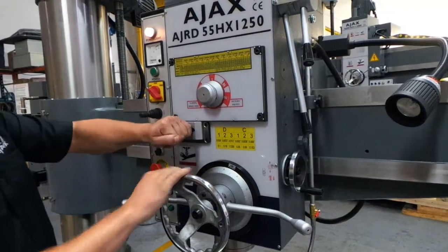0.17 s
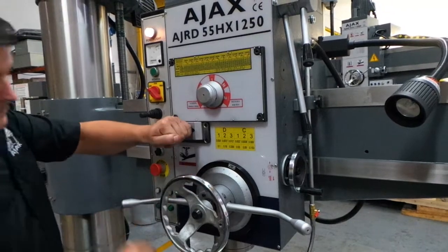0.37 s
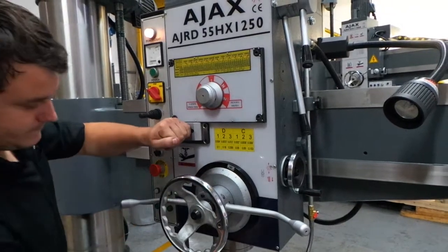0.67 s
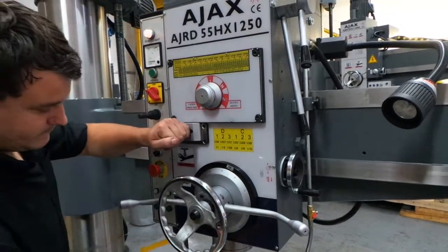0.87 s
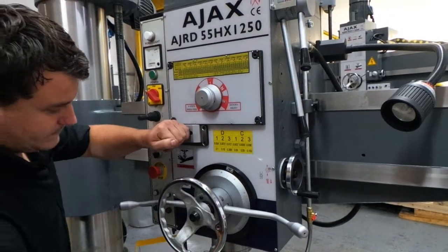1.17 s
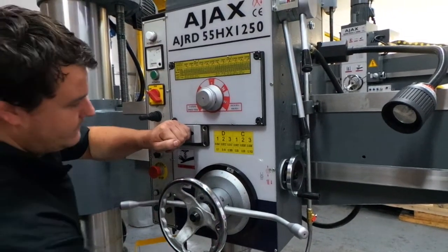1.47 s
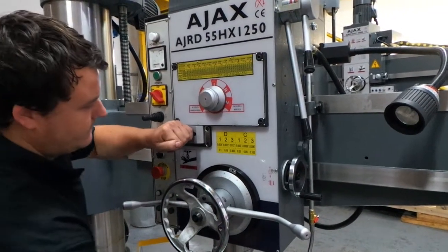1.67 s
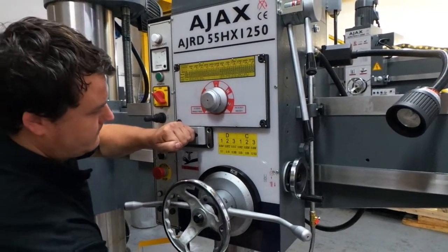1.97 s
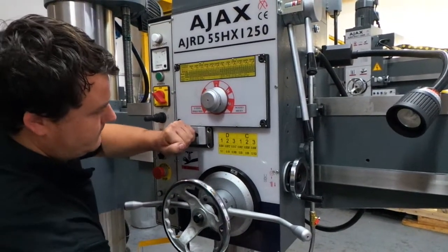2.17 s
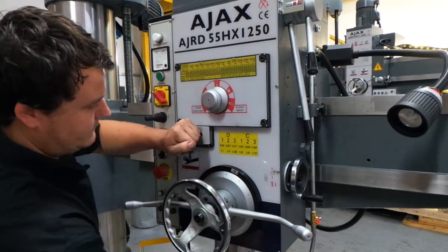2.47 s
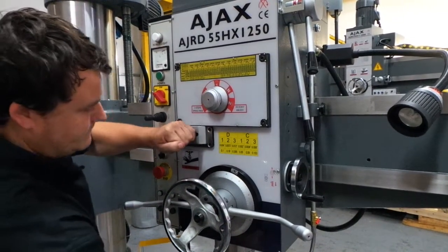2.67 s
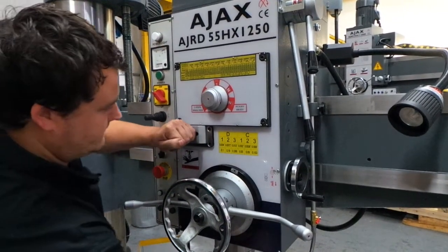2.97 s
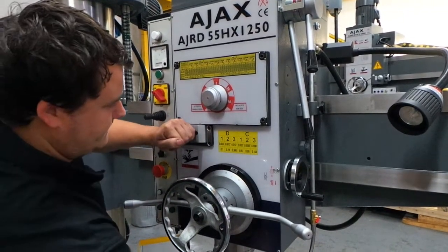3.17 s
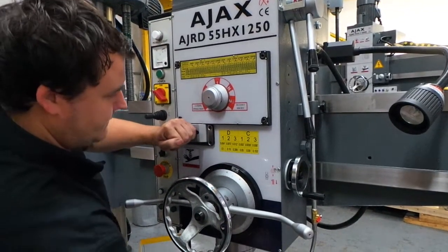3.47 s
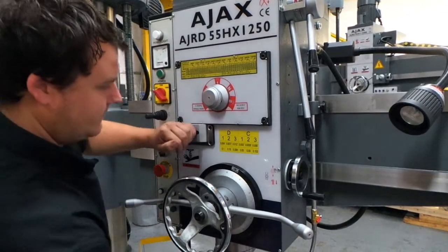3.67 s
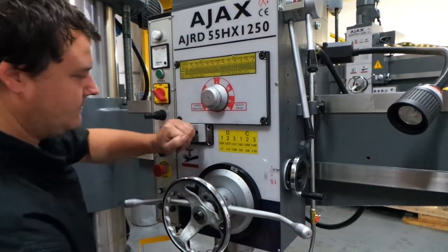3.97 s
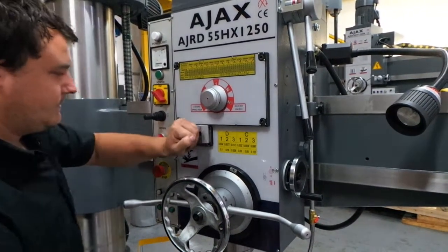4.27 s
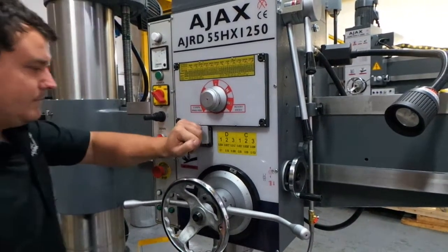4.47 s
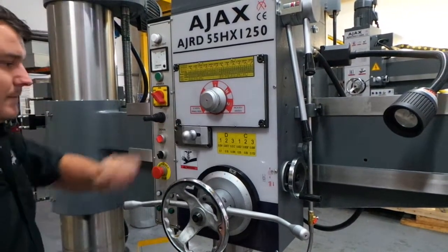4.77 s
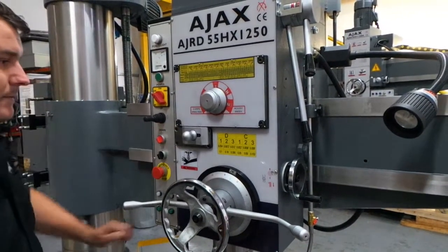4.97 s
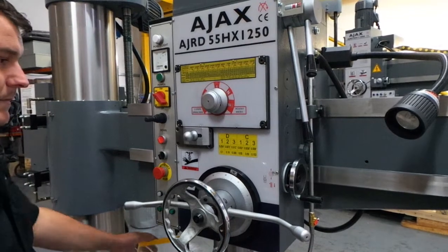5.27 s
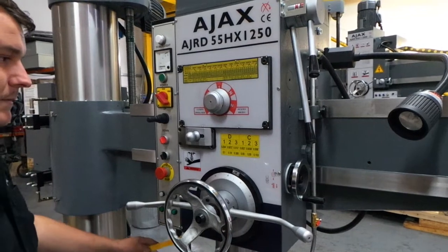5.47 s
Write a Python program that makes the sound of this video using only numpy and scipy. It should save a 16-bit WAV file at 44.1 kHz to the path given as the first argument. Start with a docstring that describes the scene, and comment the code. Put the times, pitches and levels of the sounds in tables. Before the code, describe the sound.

Dull gear knocks and light ticks, then three hard metallic clacks ring through a humming workshop as a machine's gear is changed.

```python
"""In an echoing workshop, a steel selector block is pushed by hand to change gear on a large drill.
Fans hum steadily. The block rubs in its guide and ticks, loose gears knock dully, and a faint high ring
swells once. Twice the block snaps brightly into its notch, and it slams against its end stop;
each hard blow leaves the gearbox casing and the hall ringing."""
import sys
import numpy as np
from scipy import signal
from scipy.fft import rfft, irfft, next_fast_len
from scipy.io import wavfile

SR = 44100
rng = np.random.default_rng(int(sys.argv[2]) if len(sys.argv) > 2 else 0)


def transcribe(signal):
    """Save signal, clipped to [-1, 1], as a 16-bit WAV file at the path in sys.argv[1]."""
    frames = np.atleast_2d(signal).T
    limited = np.clip(frames, -1, 1)
    pcm = np.round(limited * 32767).astype(np.int16)
    wavfile.write(sys.argv[1], SR, pcm)


N = 247070
TIME = np.arange(N) / SR
AGE = TIME[:2 * SR]   # seconds since a blow


def from_db(db):
    """Turn decibels into a factor to multiply a sound by."""
    return 10 ** (np.asarray(db) / 20)

def at_hz(points, hz):
    """Read between the rows of a table, with every octave equally wide."""
    known_hz, value = np.transpose(points)
    return np.interp(np.log(np.maximum(hz, 1)), np.log(known_hz), value)

def add(track, time_s, sound):
    """Mix a sound in at a time, which may lie before the start."""
    start = round(time_s * SR)
    part = sound[max(-start, 0):N - start]
    track[max(start, 0):max(start, 0) + len(part)] += part

def noise(colour, size, tilt_db=0):
    """Noise whose colour says how strong each frequency is; tilt_db per octave brightens it."""
    hz = np.fft.rfftfreq(size, 1 / SR)
    octaves = np.log2(np.maximum(hz, colour[1][0]))
    bass_cut = hz / (hz + colour[0][0] / 2)
    gain = from_db(at_hz(colour, hz) + tilt_db * octaves) * bass_cut
    hiss = irfft(gain * np.exp(2j * np.pi * rng.random(len(hz))), size)
    return hiss / hiss.std()

def fade(t60, size=len(AGE)):
    """Die away by 60 dB in t60 seconds, the 'fade time' of the tables."""
    return np.exp(-np.log(1000) * AGE[:size] / t60)

def ring(hz, t60):
    """One fading tone of something struck."""
    return np.sin(2 * np.pi * hz * AGE) * fade(t60)

def dull(sound, top_hz):
    """Take off the treble."""
    return signal.sosfilt(signal.butter(4, top_hz, fs=SR, output="sos"), sound)

def stroke(start_s, length_s, rise_s, t60):
    """The loudness of one rub: it rises, holds to the end of its length and dies away."""
    rise = np.clip((TIME - start_s) / rise_s, 0, 1)
    return rise * np.exp(-np.log(1000) * np.maximum(TIME - start_s - length_s, 0) / t60)


# colour of the fan noise: (frequency [Hz], level [dB])
FAN_COLOUR = [(15, -50), (25, -9.5), (98, -3), (172, -6), (191, 1), (257, -5), (488, -9), (529, -9),
              (1000, -9.5), (1120, -10), (1240, -7), (2130, -3.5), (3630, -23.5), (11800, -30),
              (15000, -40)]

def fans():
    """The workshop's fans make a quiet, steady rush."""
    return from_db(-54.5) * noise(FAN_COLOUR, next_fast_len(N))[:N]


# how long the hall rings: (frequency [Hz], fade time [s])
HALL_FADES = [(100, 1.38), (400, 1.184), (1000, 1.39), (2500, 1.25), (5000, 1.57), (8000, 0.88),
              (13000, 0.52)]

def hall_decay(sound, build_s):
    """Echoes build up, then each octave dies away at its own rate."""
    hz = np.fft.rfftfreq(len(AGE), 1 / SR)
    octave = np.log2(np.maximum(hz, 125) / 125).clip(0, 7)
    spectrum, out = rfft(sound), 0
    for k in range(8):
        band = irfft(spectrum * np.maximum(1 - abs(octave - k), 0), len(AGE))
        out = out + band * fade(at_hz(HALL_FADES, 125 * 2 ** k))
    return out * (1 - np.exp(-AGE / build_s))

def in_hall(sound, echo_db):
    """A sound together with the hall's many echoes of it."""
    echoes = hall_decay(rng.standard_normal(len(AGE)), build_s=0.0033)
    return sound + from_db(echo_db) * signal.fftconvolve(sound, echoes / np.linalg.norm(echoes))[:N]


# tones of the faint high ring: (frequency [Hz], level [dB])
HIGH_TONES = [(5572, -69), (6126, -72), (6422, -70), (8877, -65.5), (9636, -77), (12500, -78), (12850, -85),
              (13507, -75)]

def high_ring(width_hz):
    """Rubbing stirs a few thin, high tones that swell once and fade."""
    out = np.zeros(N)
    decay = np.exp(-np.pi * width_hz / SR)   # share of the ringing left after each sample
    for hz, db in HIGH_TONES:
        feedback = [1, -2 * decay * np.cos(2 * np.pi * hz / SR), decay * decay]
        tone = signal.lfilter([1, 0, -1], feedback, rng.standard_normal(N))
        out += from_db(db) * tone / tone.std()
    return from_db(4) * stroke(start_s=0.94, length_s=0.1, rise_s=0.082, t60=0.68) * out


# pushes of the hand: (start [s], length [s], level [dB])
HAND_PUSHES = [(1.73, 0.34, -58), (2.001, 0.097, -51.5), (2.968, 0.22, -48.5), (3.382, .07, -52)]
# colour of the rubbing: (frequency [Hz], level [dB])
RUB_COLOUR = [(150, -8), (550, -5), (950, -12.5), (1160, -0.5), (1350, -12), (2700, -20.5), (4500, -31),
              (10000, -38.5), (15000, -55)]

def rubbing():
    """Steel rubs in its guide with a hollow hiss; each push takes hold quickly and runs out slowly."""
    loudness = sum(from_db(db) * stroke(start_s, length_s, rise_s=0.038, t60=0.93)
                   for start_s, length_s, db in HAND_PUSHES)
    return loudness * noise(RUB_COLOUR, next_fast_len(N))[:N]


# knocks of the gears: (time [s], level [dB], brightness [dB per octave], bounce against knock [dB])
GEAR_KNOCKS = [(0.792, -37.5, 0.5, -3.5), (0.864, -31.5, .5, -0.5), (0.929, -27.5, 1, -14),
               (0.969, -30.5, 0.5, -17), (1.063, -33.5, 0.5, -5), (1.697, -36.5, -0.5, -14),
               (2.054, -36, -6, -22), (2.171, -43.5, -8, -18), (4.842, -47, 2, -20), (4.897, -49, -5, -22),
               (5.440, -34.5, -0.5, -5)]
# tones of a knock: (frequency [Hz], level [dB], fade time [s])
KNOCK_TONES = [(185, -6.5, 0.082), (299.7, -7.5, 0.26), (511, -1.5, 0.079), (583, -7.5, 0.093),
               (765, -1, 0.076), (825, -11, 0.088)]
# colour of a knock's scuff: (frequency [Hz], level [dB])
SCUFF_COLOUR = [(100, -13.5), (200, -8), (850, -2.5), (1050, -9), (2500, -19), (6000, -38.5), (14000, -57)]

def gear_knocks(rise_s, bounce_s):
    """Loose gears bump softly, waking only low tones, then fall back once, quieter and duller."""
    out = np.zeros(N)
    contact = 1 - np.exp(-AGE / rise_s)
    bumps = []
    for time_s, db, tilt_db, bounce_db in GEAR_KNOCKS:
        bumps += [(time_s, db, tilt_db), (time_s + bounce_s, db + bounce_db, tilt_db - 4)]
    for time_s, db, tilt_db in bumps:
        thud = 0
        for hz, tone_db, t60 in KNOCK_TONES:
            strength = from_db(tone_db + tilt_db * np.log2(hz / 450))
            thud = thud + strength * rng.choice([-1, 1]) * ring(hz * rng.normal(1, 0.015), t60)
        scuff = from_db(-4.5) * noise(SCUFF_COLOUR, len(AGE), tilt_db) * fade(t60=0.14)
        add(out, time_s, from_db(db) * contact * (thud + scuff))
    return out


# light touches: (time [s], level [dB], pitch [Hz], fade time [s], brightness [dB per octave])
TOUCHES = [(0.862, -47, 2920, .06, 1), (0.919, -41.5, 3500, .085, 9.5), (1.6913, -31, 2665, .061, 0),
           (2.026, -44, 2300, .13, -1.5), (3.642, -41.5, 2550, .056, -2)]
# colour of a touch's rasp: (frequency [Hz], level [dB])
RASP_COLOUR = [(100, -6), (500, 8), (800, -1.5), (1120, 7.5), (1600, 3), (2700, 5.5), (3400, -2),
               (3900, -7), (4400, -12), (5300, -12), (7200, -24.5), (8400, -22.5), (10500, -47.5),
               (15000, -50.5)]

def ticks(extra_touches, rise_s):
    """Steel brushes steel as the gears line up: a short rasp and one ringing pitch each time."""
    out, size = np.zeros(N), SR // 4
    contact = 1 - np.exp(-AGE[:size] / rise_s)
    for time_s, db, hz, t60, tilt_db in TOUCHES + extra_touches:
        rasp = noise(RASP_COLOUR, size, tilt_db) * fade(t60, size)
        ping = from_db(-3.5) * ring(hz, t60)[:size]
        add(out, time_s, from_db(db) * contact * (rasp + ping))
    return out

def lip_touches(lead_s):
    """Before each snap the block grazes the lip of its notch, then tips over it: rows like TOUCHES."""
    rows = []
    for snap_s, *_ in SNAPS:
        graze = (snap_s - lead_s - 0.0064, -36.5, 2400, 0.09, -3)
        tip_over = (snap_s - lead_s, -30, 2400, 0.028, 2)
        rows += [graze, tip_over]
    return rows


# long tones of the casing: (frequency [Hz], fade time [s], level in a snap [dB], level in a slam [dB])
CASING_TONES = [(146, 0.85, -50, -45.5), (161.1, 0.41, -40, -35), (252, 0.49, -42.5, -27),
                (305.4, 0.63, -44.5, -37), (429.4, 1.5, -47, -31.5), (479.5, 1.1, -34.5, -34.5),
                (595, 0.44, -47, -38), (725, 0.51, -28, -22.5), (794, 0.56, -43.5, -28.5),
                (824, 1.46, -51.5, -33.5), (1168, 1.1, -42.5, -34), (1480, 1.9, -43.5, -43),
                (2085, 2.3, -40.5, -46.5), (2290, 0.96, -34, -38), (2450, .9, -39, -44),
                (2810, 0.33, -30, -53), (3840, 1.3, -55, -41), (4000, 0.93, -47.5, -41),
                (4570, 0.95, -41, -46.5), (5260, 0.47, -49.5, -66)]

def casing_ring(kind, bass_db, build_s):
    """The casing rings in groups of three close tones, which waver as they beat against each other."""
    out = 0
    for hz, t60, snap_db, slam_db in CASING_TONES:
        offsets = np.linspace(-1, 1, 3) + rng.uniform(-0.3, 0.3, 3)
        phases = rng.uniform(0, 2 * np.pi, (3, 1))
        tones = np.sin(2 * np.pi * np.outer(hz * (1 + 0.009 * offsets), AGE) + phases)
        db = (snap_db if kind == "snap" else slam_db) + bass_db / (1 + (hz / 560) ** 4)
        out = out + from_db(db) * tones.sum(axis=0) * fade(t60) / np.sqrt(3)
    return out * (1 - np.exp(-AGE / build_s))   # the heavy casing takes a moment to get going


# colour of steel faces cracking and chattering together: (frequency [Hz], level [dB])
STEEL_COLOUR = [(60, -41.5), (300, -14.5), (700, 11.5), (1400, -11.5), (2500, 3.5), (3400, -10),
                (5800, -10.5), (8500, -28.5), (14500, -34)]
# echoes from a column and the floor: (delay [s], level [dB])
NEAR_ECHOES = [(0.0145, -35), (0.04, -18)]

def hard_blows(kind, hits, tones, hall_colour, rise_s, crack_db, chatter_t60, chatter_tilt_db, build_s):
    """A blow cracks and briefly rings the block; the faces chatter, and casing and hall ring on."""
    out = np.zeros(N)
    contact = 1 - np.exp(-AGE / rise_s)   # the force grows as the faces meet
    bass_cut = signal.butter(1, 130, "high", fs=SR, output="sos")   # the blow itself carries little deep bass
    block = sum(from_db(db) * ring(hz, t60) for hz, db, t60 in tones)
    for time_s, blow_db, chatter_db, hall_db, casing_db, bass_db in hits:
        crack = from_db(crack_db) * noise(STEEL_COLOUR, len(AGE), tilt_db=6) * fade(t60=0.011)
        blow = signal.sosfilt(bass_cut, from_db(blow_db) * contact * (block + crack))
        rattle = contact * noise(STEEL_COLOUR, len(AGE), chatter_tilt_db) * fade(chatter_t60)
        chatter = from_db(chatter_db) * dull(rattle, top_hz=9800)   # the top treble is left to the crack
        hall = from_db(hall_db) * hall_decay(noise(hall_colour, len(AGE)), build_s)
        casing = from_db(casing_db) * casing_ring(kind, bass_db, build_s)
        add(out, time_s, blow + chatter + hall + casing)
        for delay_s, echo_db in NEAR_ECHOES:
            add(out, time_s + delay_s, from_db(echo_db) * dull(blow, top_hz=8500))
    return out


# snaps into the notch: (time [s], blow [dB], chatter [dB], hall [dB], casing [dB], casing bass [dB])
SNAPS = [(2.3051, -1, -18, -28.5, -2, -0.5), (4.1684, 1.5, -21, -28, -3.5, -7.5)]
# tones of the block, cut short by the hand: (frequency [Hz], level [dB], fade time [s])
SNAP_TONES = [(610, -31.5, 0.037), (731, -22, 0.084), (1060, -16, 0.027), (1260, -17, 0.03),
              (1445, -6.5, 0.019), (2044, -19, 0.017), (2315, -9, 0.025), (2397, -4.5, 0.019),
              (2740, -10, 0.021), (4130, -16.5, 0.02), (4530, -14.5, 0.013), (5640, -15, 0.013),
              (11800, -26, .008)]
# colour of the blurred ring of machine and hall after a snap: (frequency [Hz], level [dB])
SNAP_HALL_COLOUR = [(41, -64), (70, -25.5), (136, -5), (222, -15), (353, -12), (451, -4.5), (538, -8.5),
                    (767, 1.5), (916, -5.5), (1820, -6.5), (2380, -3), (3620, -15), (6440, -16.5),
                    (11700, -36), (14000, -79)]

def notch_snaps():
    """The block drops into its notch with a sudden, bright snap."""
    return hard_blows("snap", SNAPS, SNAP_TONES, SNAP_HALL_COLOUR, rise_s=0.0002,
                      crack_db=-14.5, chatter_t60=0.12, chatter_tilt_db=1, build_s=0.019)


# slams on the end stop: (time [s], blow [dB], chatter [dB], hall [dB], casing [dB], casing bass [dB])
SLAMS = [(-0.10, -6, -24, -32.5, -8.5, -0.48), (2.6289, 5, -14, -26, -2, 0.56)]
# tones of the block in a slam: (frequency [Hz], level [dB], fade time [s])
SLAM_TONES = [(487, -21, 0.04), (750, -8, .022), (1130, -1, 0.012), (1253, -5, 0.012), (1406, -10, 0.026),
              (1920, -12, 0.017), (2290, -15, 0.015), (2820, -22, 0.02), (3650, -9.5, 0.015),
              (5300, -25.5, .008)]
# colour of the blurred ring of machine and hall after a slam: (frequency [Hz], level [dB])
SLAM_HALL_COLOUR = [(40, -43), (80, -13), (146, -2.5), (352, -9), (450, 2), (750, -2), (1250, -5),
                    (1770, -10), (2300, -10.5), (3200, -17), (6000, -24), (8600, -31.5), (10500, -72),
                    (15000, -77)]

def end_stop_slams():
    """The block hits its end stop with a deeper clack; the first slam falls just before the start."""
    return hard_blows("slam", SLAMS, SLAM_TONES, SLAM_HALL_COLOUR, rise_s=0.00083,
                      crack_db=-21, chatter_t60=0.06, chatter_tilt_db=-0.5, build_s=0.0033)


def scene():
    """Add up all the sounds, the same for the left and right ear."""
    blows = notch_snaps() + end_stop_slams()
    ticking = in_hall(ticks(lip_touches(lead_s=0.046), rise_s=0.00063), echo_db=-10)
    knocking = in_hall(gear_knocks(rise_s=0.0043, bounce_s=0.023), echo_db=-11)
    mono = blows + ticking + knocking + rubbing() + high_ring(width_hz=95) + fans()
    return np.array([mono, mono])

def record(dry):
    """The hardest blows overload and have their peaks flattened; treble above 15000 Hz is cut."""
    treble_cut = signal.ellip(10, 0.1, 80, 15000, fs=SR, output="sos")
    return signal.sosfilt(treble_cut, np.clip(dry, -1, 1))


dry = scene()
out = record(dry)
transcribe(out)
```